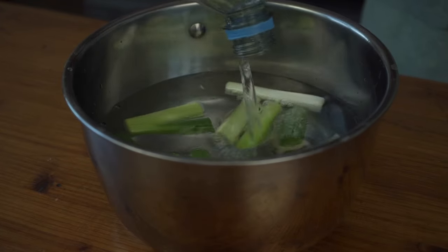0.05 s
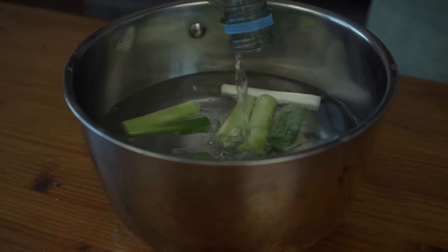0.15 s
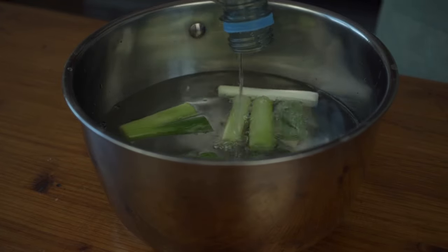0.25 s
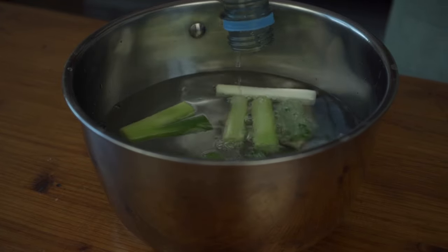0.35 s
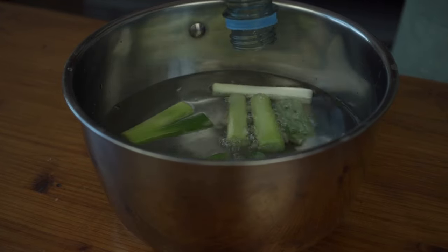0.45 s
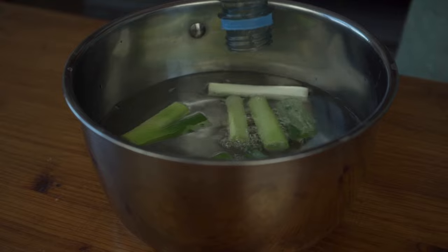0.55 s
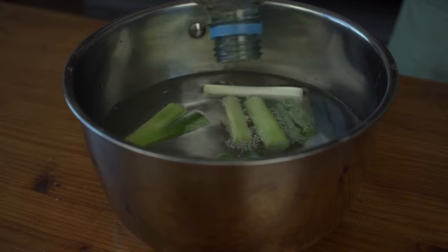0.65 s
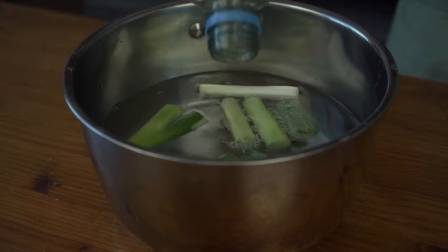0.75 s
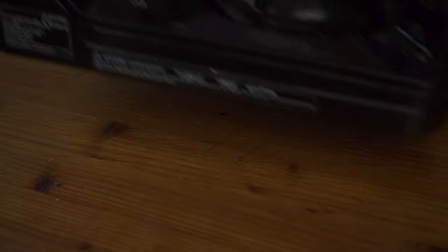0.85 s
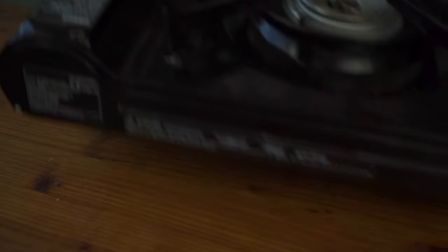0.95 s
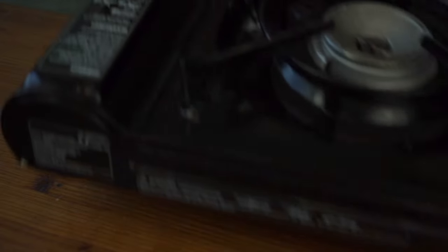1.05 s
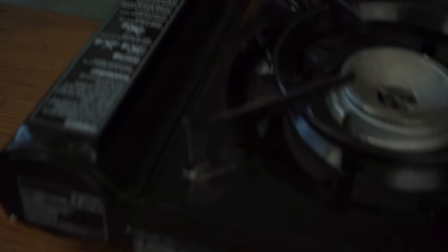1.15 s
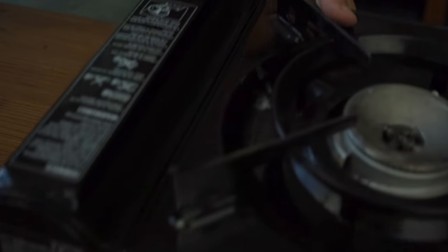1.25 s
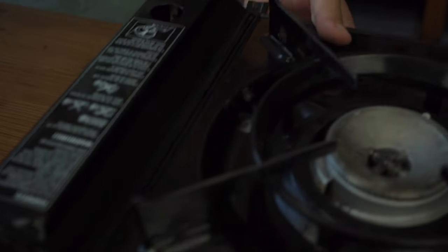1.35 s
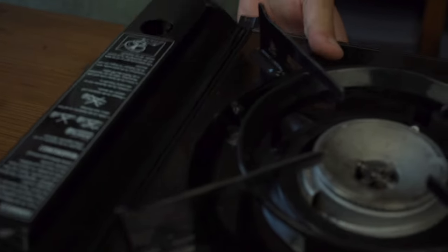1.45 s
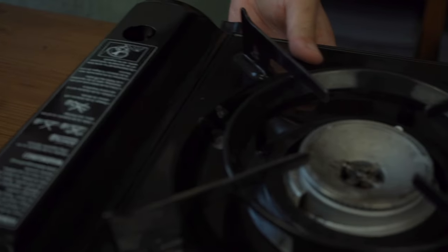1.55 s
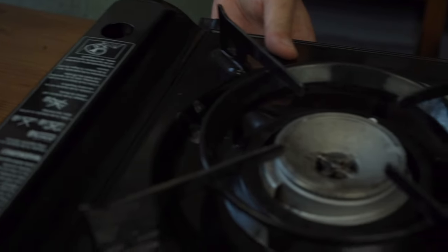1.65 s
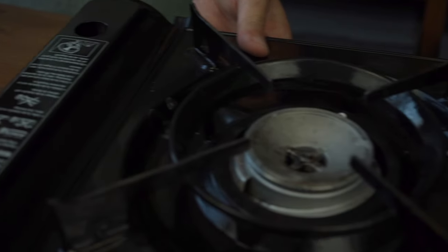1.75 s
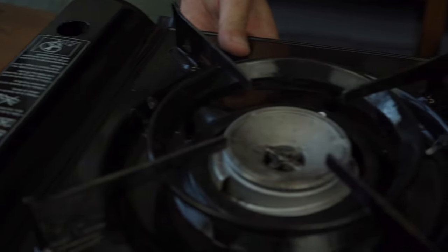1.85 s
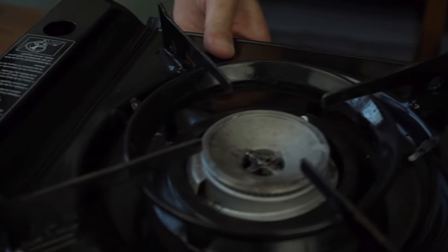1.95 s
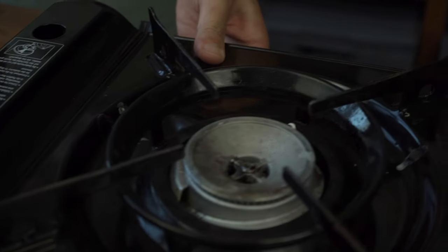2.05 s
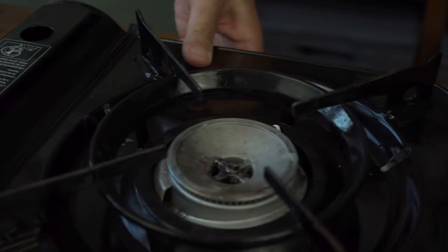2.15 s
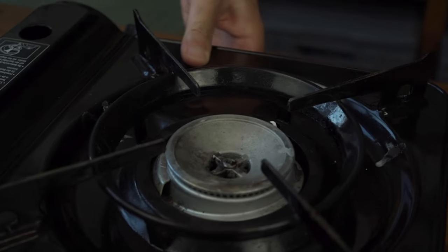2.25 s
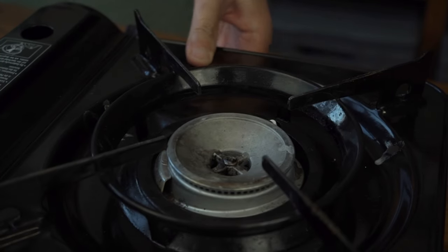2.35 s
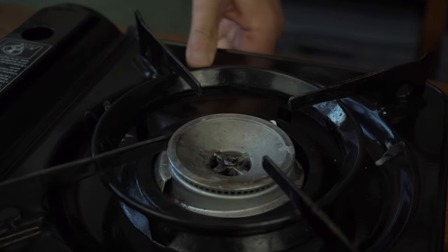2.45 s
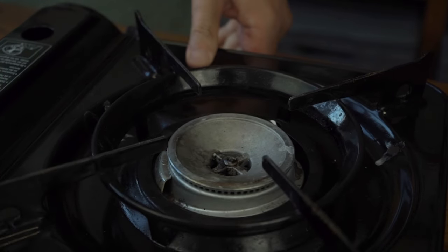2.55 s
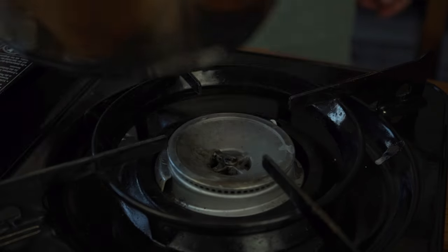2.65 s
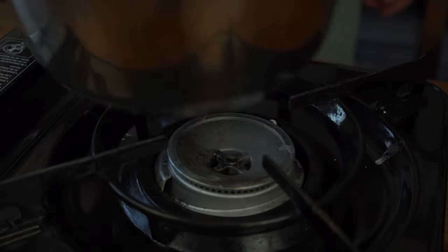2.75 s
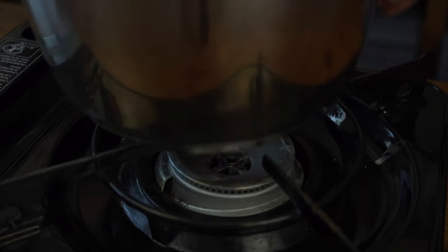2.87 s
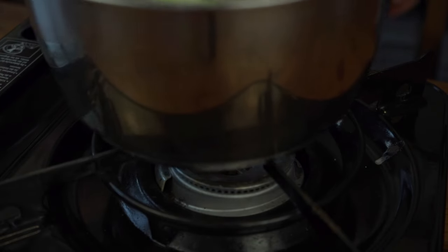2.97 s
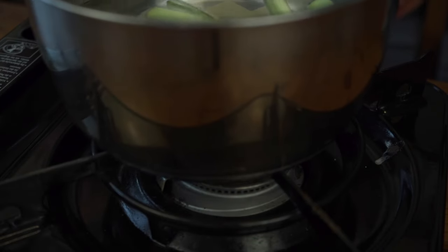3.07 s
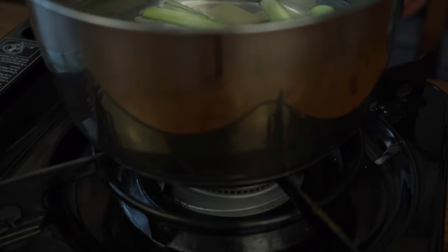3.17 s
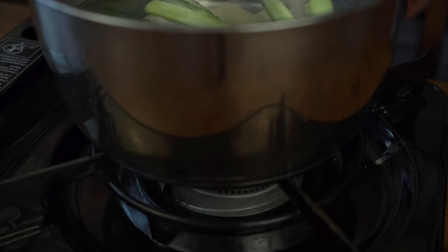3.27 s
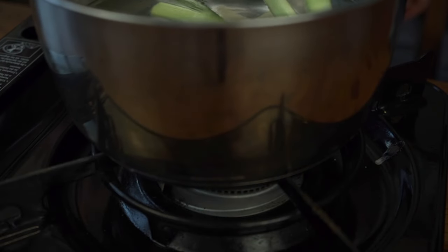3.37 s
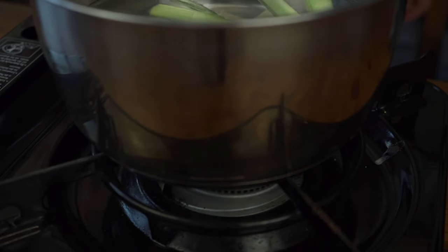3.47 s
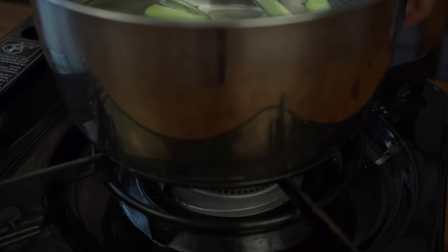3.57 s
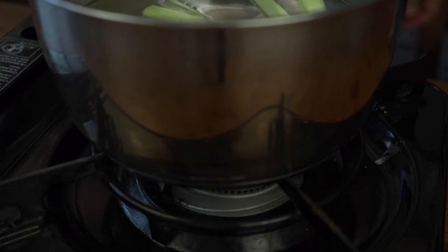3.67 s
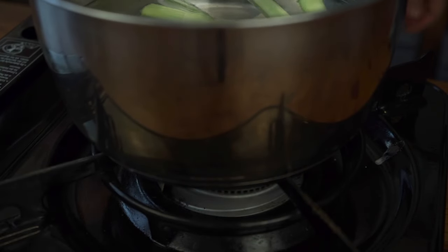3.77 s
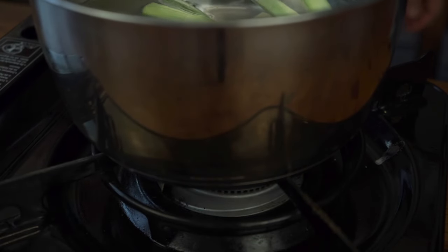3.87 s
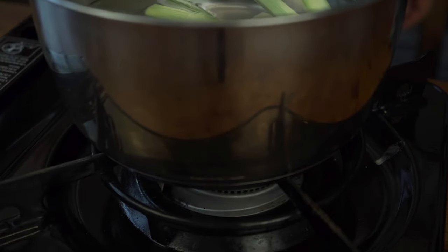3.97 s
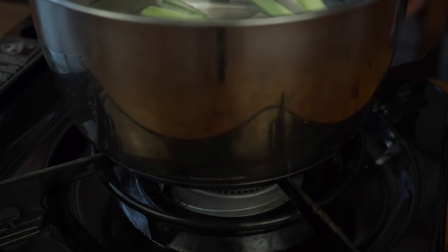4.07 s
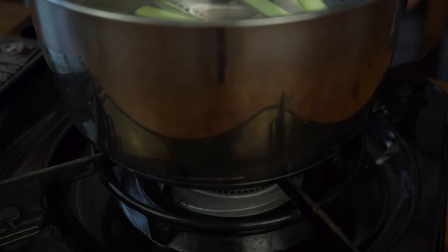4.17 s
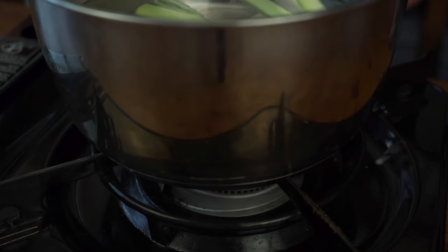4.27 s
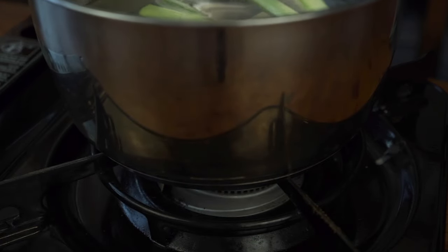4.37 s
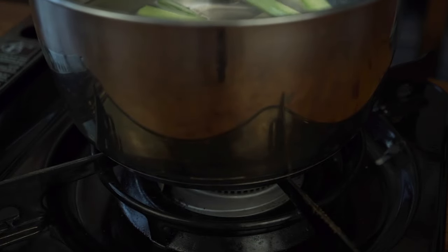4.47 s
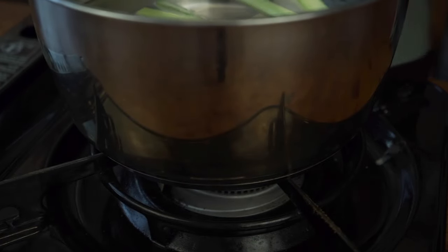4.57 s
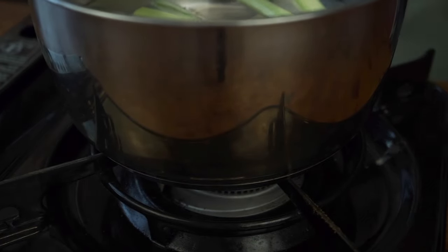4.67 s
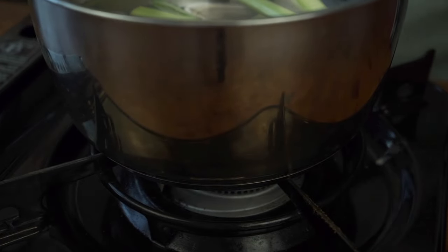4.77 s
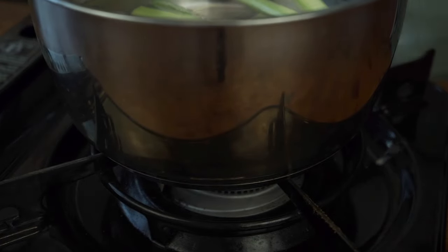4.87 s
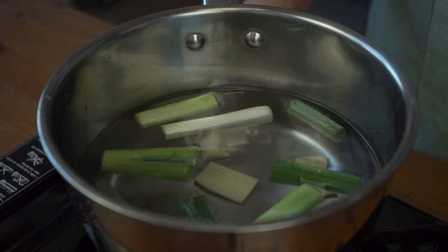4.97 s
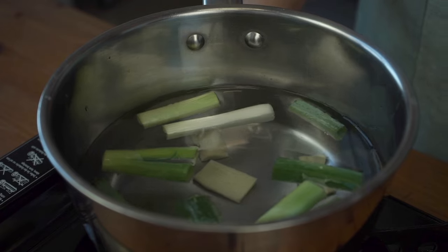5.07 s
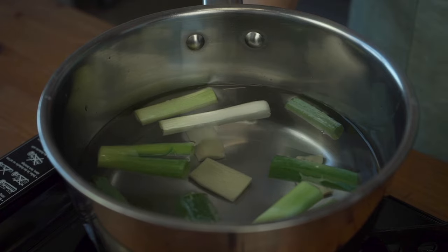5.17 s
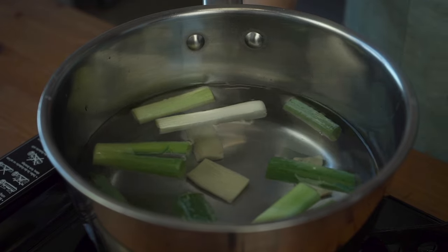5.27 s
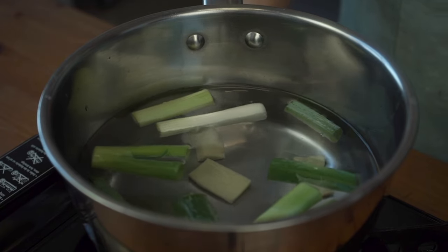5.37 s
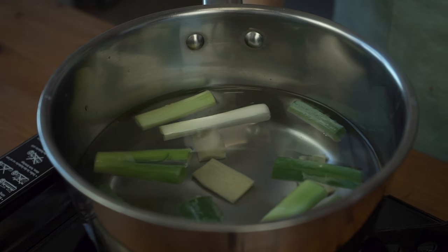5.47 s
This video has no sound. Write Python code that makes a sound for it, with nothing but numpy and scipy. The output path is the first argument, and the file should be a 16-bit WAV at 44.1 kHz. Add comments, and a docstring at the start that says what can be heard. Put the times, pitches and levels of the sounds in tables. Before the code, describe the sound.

Brief water drips, sheet-metal stove clunks and scrapes on wood, heavy pot knocks on a grate, finally a latch click and short hiss.

```python
"""A sheet-metal camping stove is put on a wooden table and shifted: chattering contacts drive its modes.
Before it the last water trickles from a bottle into a steel pot, as bubbles that ring and splashes.
Then the full pot is set on the grate and rocks on it, and the stove's gas lever is pushed home with
a spurt of hissing, whistling noise. The table sways at its lowest mode beneath a small kitchen's tone
and echo; drops, blows and sway break off within milliseconds at three instants."""
import sys
import numpy as np
from scipy import signal
from scipy.fft import rfft, irfft, next_fast_len
from scipy.io import wavfile
from scipy.ndimage import uniform_filter1d, map_coordinates

SR = 44100
rng = np.random.default_rng(int(sys.argv[2]) if len(sys.argv) > 2 else 0)


def linear_from_db(decibels):
    """Turn decibels (scalar or array-like) into linear amplitude factors; 0 gives 1."""
    return 10 ** (np.asarray(decibels, float) / 20)


def generate_wav(signal):
    """Clip the signal to [-1, 1] and save it as 16-bit WAV at the path in sys.argv[1]."""
    frames = np.transpose(np.atleast_2d(signal))
    scaled = np.clip(frames, -1, 1) * 32767
    pcm = np.round(scaled).astype(np.int16)
    wavfile.write(sys.argv[1], SR, pcm)


N = 243520


def unit(x):
    """Normalisation to a root-mean-square of 1."""
    return x / np.sqrt(np.mean(x ** 2) + 1e-20)


def along(points, hz):
    """Interpolation of (Hz, value) points on a logarithmic frequency axis."""
    f, v = np.transpose(points)
    return np.interp(np.log(hz + 1), np.log(f + 1), v)


def curves(rows):
    """Linear interpolation in time: one value per sample for each column after the time."""
    s, *columns = np.transpose(rows)
    return [np.interp(np.arange(N) / SR, s, column) for column in columns]


def during(rows):
    """A rectangular gate: true from the first to the last time of the rows."""
    t = np.arange(N) / SR
    return (t >= rows[0][0]) & (t <= rows[-1][0])


def wobble(rate):
    """Slow random fluctuation: a smooth curve through random knots, rate of them per second."""
    knots = rng.standard_normal(int(N * rate / SR) + 4)
    return map_coordinates(knots, [np.arange(N) * rate / SR])


def filtered(x, response):
    """Linear filtering: the spectrum of x times a complex response of frequency."""
    m = next_fast_len(len(x) + SR // 4)
    return irfft(rfft(x, m) * response(np.fft.rfftfreq(m, 1 / SR)), m)[:len(x)]


def noise(spectrum):
    """Coloured noise: white noise shaped by (Hz, dB) points, at rms 1."""
    return unit(filtered(rng.standard_normal(N), lambda hz: linear_from_db(along(spectrum, hz))))


def causal(gain):
    """Minimum phase: folding the cepstrum lets nothing sound before the blow."""
    cepstrum = irfft(np.log(gain + 1e-6))
    cepstrum[1:len(cepstrum) // 2] *= 2
    cepstrum[len(cepstrum) // 2 + 1:] = 0
    return np.exp(rfft(cepstrum))


def ringing(modes, hz, spread_db):
    """Modal superposition: damped resonances, each excited at a new random strength."""
    total = 0
    for k, (centre, db, t60) in enumerate(modes):
        width = np.log(1000) / np.pi / t60  # Hz; a longer decay is a narrower resonance
        strength = (-1) ** k * linear_from_db(db + spread_db * rng.standard_normal())
        damping = 1j * hz * width
        total = total + strength * damping / (centre * centre - hz * hz + damping)
    return total


def kitchen(x, wet_db):
    """Reverberation: the sound plus a diffuse echo whose decay depends on frequency."""
    # Each row: frequency in Hz, decay time (60 dB) in seconds
    decay = [(100, 0.41), (1000, 0.44), (4000, 0.36), (9000, 0.34), (16000, 0.08)]
    hz, t, z = signal.stft(rng.standard_normal(SR // 2), SR, nperseg=256)
    fading = linear_from_db(-60 * t / along(decay, hz)[:, None])
    tail = signal.istft(z * fading, SR, nperseg=256)[1]
    tail *= np.clip(np.arange(len(tail)) / (SR * 0.0022), 0, 1)  # the echo builds up over 2.2 ms
    return x + linear_from_db(wet_db) * signal.fftconvolve(x, tail / np.linalg.norm(tail))[:len(x)]


def add(out, s, sound):
    """Superposition at time s; a 4 ms fade ends the sound at the next break."""
    # The instants, in seconds, at which sounds break off
    breaks = [.845, 2.627, 4.93]
    start = round(s * SR)
    end = min([round(b * SR) for b in breaks if b > s] + [N + SR])
    left = (end - start - np.arange(len(sound))) / SR
    out[start:][:len(sound)] += (sound * np.clip(left / .004, 0, 1))[:N - start]


def trickle():
    """Bubble acoustics in bulk: many tiny decaying bubbles, smaller ones fainter, merge into a fizz."""
    # Each row: time in seconds, relative level of the fizz in dB
    fizz_level = [(0.0, -53.5), (0.218, -51), (0.348, -54), (0.5, -101)]
    when, pitch, size = rng.random((450, 3)).T
    start = (when * fizz_level[-1][0] * SR).astype(int)
    hz = 1500 * 7.5 ** pitch[:, None]
    u = np.arange(400) / SR
    grains = linear_from_db(16 * size ** 2)[:, None] * np.sin(2 * np.pi * hz * u) * np.exp(-u * hz / 4.5)
    fizz = np.bincount((start[:, None] + np.arange(len(u))).ravel(), grains.ravel(), N)
    gate = during(fizz_level)
    return linear_from_db(curves(fizz_level)[0] - 5.5) * gate * fizz / np.std(fizz[gate])


def room_tone():
    """Stationary coloured noise for the air, and a faint amplitude-modulated hiss that comes and goes."""
    # Each row: frequency in Hz, level in dB per Hz (before scaling to rms 1)
    air = [(24, -36), (40, 7), (85, -17.5), (118, -32), (163, -6.5), (269, -4), (297, -9.5), (479, -10),
           (646, -10.5), (990, -12.5), (1300, -14), (1760, -17.5), (3470, -25.5), (4680, -23),
           (16000, -43.5)]
    # Each row: frequency in Hz, level in dB per Hz (before scaling to rms 1)
    hiss_colour = [(1470, 4), (2500, 2.5), (4410, 0.5), (8660, -1.5), (11200, -11), (13800, -10),
                   (16000, -25)]
    # Each row: start in seconds, length in seconds, relative level in dB
    swell_rows = [(0.454, 0.53, -61), (1.676, 0.49, -65), (2.0, .03, -82), (2.011, 0.41, -64),
                  (3.497, 0.2, -66), (3.924, 0.13, -62), (4.059, 0.33, -59), (4.442, .03, -74),
                  (4.59, 0.1, -60), (4.786, 0.18, -61)]
    edge = 0.23  # share of a swell spent rising, and again fading
    t = np.arange(N) / SR
    swells = 0
    for s, length, db in swell_rows:
        rise_and_fade = np.minimum(t - s, s + length - t) / (edge * length)
        swells = swells + linear_from_db(db - 1.5) * np.clip(rise_and_fade, 0, 1)
    return linear_from_db(-59) * noise(air) + swells * linear_from_db(0.53 * wobble(15)) * noise(hiss_colour)


def table():
    """Damped vibration: jolts sway the table at its lowest mode, felt through the microphone stand.

    A rumble of the legs and a low hum follow the power of the sway."""
    # Each row: start in seconds, level in dB (before the slow rise), frequency in Hz, decay time in seconds
    jolts = [(0.039, -39.5, 37.8, 0.57), (0.219, -56, 37.5, 0.47), (.6, -66, 40, 0.43), (.84, -53, 40, .5),
             (1.038, -46, 36.6, 1.7), (1.255, -23.5, 38.5, 0.42), (1.345, -24.5, 37.4, 0.45),
             (1.444, -13, 33.2, 0.83), (2.02, -31, 35.45, 0.83), (2.299, -35, 36.1, 1.3),
             (2.48, -23, 34, 0.62), (3.147, -30, 37.8, 0.97), (3.409, -31.5, 38.1, 0.75),
             (3.589, -39.5, 33.86, 0.73), (3.73, -40.5, 34.1, .9), (3.94, -40, 36, .8),
             (4.191, -35, 36, 0.71), (4.45, -44, 37.7, 1.1), (4.711, -38.5, 36.8, 0.9),
             (4.931, -46, 38, 0.48), (5.12, -41, 34.5, .6), (5.214, -29.5, 34, 0.55),
             (5.338, -25, 31.6, 2.3)]
    # Each row: frequency in Hz, level in dB per Hz (before scaling to rms 1)
    hum_colour = [(50, -27.5), (90, -1), (140, 0.5), (200, -3), (450, -16.5), (900, -53)]
    rise_s, rest_db = 0.034, -62.5
    sway, power, t = np.zeros(N), np.full(N, linear_from_db(2 * rest_db)), np.arange(SR) / SR
    for s, db, hz, t60 in jolts:
        size = linear_from_db(db - 60 * t / t60) * (1 - np.exp(-t / rise_s)) ** 2
        add(sway, s, np.sqrt(2) * size * np.sin(2 * np.pi * (hz * t + rng.random())))
        add(power, s, size ** 2)
    sway_db = 10 * np.log10(power)
    legs = noise([(10, -19.0), (20, 13.0), (50, 5.5), (75, -5), (120, -54.0)])  # (Hz, dB)
    rumble = unit(linear_from_db(1.9 * wobble(31)) * legs)
    # the hum lies at -53.5 dB for a sway of -37 dB and grows 0.52 dB per dB of sway
    hum_db = -53.5 + 0.52 * (sway_db + 37) + 1.4 * wobble(45)
    return sway + linear_from_db(sway_db - 5) * rumble + linear_from_db(hum_db) * noise(hum_colour)


def drops():
    """Bubble resonance: each drop closes a bubble of rising pitch, and its splash rings the filled pot. The
    last row, at 0.749 s, is a lone small knock made the same way."""
    # Each row: time in seconds, relative level in dB, bubble pitch at its start in Hz,
    # relative splash level against the bubble in dB
    drop_rows = [(0.04, -25, 1820, 6.5), (0.063, -39, 2050, 3), (0.093, -40, 3450, 8),
                 (0.099, -26.5, 1315, -1.5), (0.141, -28, 1048, -4), (0.154, -32, 880, -4),
                 (0.195, -32.5, 2700, -2), (0.242, -43, 1350, -15), (0.249, -35.5, 3300, -30),
                 (0.263, -32.5, 2920, -9), (0.278, -35, 947, -24), (0.28, -23.5, 2606, -23),
                 (0.289, -26.5, 3050, -34), (0.321, -48, 2630, -14), (0.255, -43, 2800, -15),
                 (0.27, -41, 2780, -20), (0.336, -47, 2580, -7), (0.345, -32.5, 2490, -11),
                 (0.376, -40.5, 3950, -4.5), (0.303, -43, 2950, -20), (0.105, -35, 1140, -4),
                 (0.749, -44, 870, -8)]
    # (Hz, dB per Hz)
    spray_colour = [(600, -24), (1500, -14), (5000, -9), (6600, -6), (7300, 0), (8500, 0), (9500, -6),
                    (12000, -9), (16000, -16)]
    # (Hz, dB, decay time s)
    filled_pot = [(1000, 0, .06), (1400, -5, .04), (1950, -2, .07), (2620, -2, .06), (3600, -5, .03),
                  (5700, -8, .02)]
    t60 = 0.021  # s, of bubble and splash
    out, t = np.zeros(N), np.arange(SR // 4) / SR
    for s, db, hz, splash_db in drop_rows:
        smooth = uniform_filter1d(uniform_filter1d(rng.standard_normal(len(t)), size=30), size=30)
        envelope = linear_from_db(-60 * t / t60 + 3 * unit(smooth)) * (1 - np.exp(-t / 0.00019))
        bubble = envelope * np.sin(2 * np.pi * hz * t * (1 + 0.042 * t / t60))
        spray = unit(filtered(rng.standard_normal(len(t)), lambda f: linear_from_db(along(spray_colour, f))))
        drop = linear_from_db(db - 2.5) * (bubble + linear_from_db(splash_db - 6.0 - 60 * t / t60) * spray)
        drop = drop + linear_from_db(4) * filtered(drop, lambda f: ringing(filled_pot, f, spread_db=3))
        add(out, s - .0005, kitchen(drop, wet_db=-14.0))
    return out


def blows(rows, modes, colour, linger, click_share, ring_db, push_db, thud_hz, wet_db, trim_db):
    """Impact excitation: bursts of chattering contact drive a body's broad response and its modes."""
    out, t = np.zeros(N), np.arange(16384) / SR
    hz = np.fft.rfftfreq(len(t), 1 / SR)
    low = 1 / (1 + 1j * hz / 900)  # low-pass at 900 Hz
    for s, db, thud_db, edge_db, t60 in rows:
        # the first touch stands out of the chatter, more so in hard blows
        crack = linear_from_db(3 + 0.3 * (db + 1) - 60 * t / 0.007)
        chatter = rng.standard_normal(len(t)) * (1 - np.exp(-t / (0.006 * t60))) * (1 + crack)
        brief = chatter * linear_from_db(-60 * t / t60)
        # heavy parts keep shaking after the treble has died
        lingering = chatter * linear_from_db(-60 * t / (linger * t60))
        contact = rfft(brief) * (1 - low) + rfft(lingering) * low
        contact = contact + linear_from_db(push_db) * np.linalg.norm(brief) * low  # one blunt push begins it
        # a flat landing adds thud, a hard edge adds click and, more so, treble
        click_db = click_share * edge_db
        tilt = along([(thud_hz, thud_db), (2.0 * thud_hz, 0), (1400, 0), (2400, click_db),
                      (4200, click_db), (5000, edge_db)], hz)
        body = causal(linear_from_db(along(colour, hz) + tilt))
        z = contact * body * (3 + linear_from_db(ring_db) * ringing(modes, hz, spread_db=3))
        # the level is set by the middle band in the first 8 ms
        first = irfft(z * (hz > 500) * (hz < 4500))[:round(SR * .008)]
        blow = linear_from_db(db + trim_db) * irfft(z) / np.sqrt(np.mean(first ** 2))
        add(out, s, kitchen(blow, wet_db))
    return out


def stove():
    """Impact of thin sheet metal on wood: the stove's panels ring in their modes."""
    # Each row: start in seconds, relative level in dB, extra thud in dB, extra edge in dB,
    # chatter decay time in seconds
    stove_blows = [(1.252, -7, -4.5, 10, 0.053), (1.285, -33, -2.5, 10, 0.111),
                   (1.298, -18.5, -5.5, 7, 0.081), (1.332, -19, -4, 7, 0.17),
                   (1.366, -22.5, -17, 5.5, 0.075), (1.384, -25, 8, 3.5, .039),
                   (1.427, -27, -13, -25, 0.12), (1.437, -5, 8.5, -2.8, 0.16), (1.454, -8, -0.5, 0.5, 0.05),
                   (1.467, -14, 2, -2.5, 0.23), (1.594, -27, -20, -6.5, 0.16), (1.778, -35, 5.5, -27, 0.15),
                   (2.007, -30.5, 3.5, -3.5, .067), (2.039, -40.5, 13, -9, 0.13),
                   (2.204, -37.5, -14, -30, 0.072), (2.28, -32.5, 6.5, -21, 0.1),
                   (2.479, -19, 8, 9.5, 0.067), (2.488, -22, 10, 1, 0.049), (2.496, -14, 8.5, -9, 0.079)]
    # Each row: frequency in Hz, relative strength in dB, decay time in seconds
    stove_modes = [(125, 6, .16), (339, 4, .1), (440, 7, .04), (578, 4, .07), (807, 2, .07), (930, 5, .07),
                   (1130, 5, .07), (1367, 3, .07), (1852, 2, .06), (2191, 3, .06), (2676, 3, .05),
                   (3365, 1, .04), (4210, 1, .05), (6600, 3, .04)]
    # Each row: frequency in Hz, relative gain of the broad body in dB
    stove_colour = [(35, -36.5), (70, 3), (150, -6.5), (250, -5.5), (400, -11), (700, -5.5), (1100, -2),
                    (1600, -6), (2600, -9.5), (5000, -17.5), (8500, -21), (12000, -34), (16000, -39)]
    return blows(stove_blows, stove_modes, stove_colour, linger=1.11, click_share=0.36, ring_db=1.5,
                 push_db=-3.5, thud_hz=490, wet_db=-12.0, trim_db=-9.5)


def slide():
    """Friction excitation: the feet, dragged on wood, rub unevenly and keep the panels murmuring."""
    # Each row: time in seconds, relative level in dB
    drag = [(1.62, -48), (1.78, -46), (1.89, -51.5), (2.02, -48.5), (2.2, -50.5), (2.27, -53), (2.36, -80)]
    # (Hz, dB, decay time s)
    panels = [(300, -3, .01), (600, 0, .015), (850, -2, .015), (1130, 3, .022), (1350, -2, .018),
              (1850, -9, .008), (2600, -19, .004)]
    rub = rng.standard_normal(N) * linear_from_db(3.5 * wobble(25))
    murmur = unit(filtered(rub, lambda hz: ringing(panels, hz, spread_db=1)))
    return linear_from_db(curves(drag)[0] - 2.5) * during(drag) * murmur


def rocking():
    """Repeated impact: each rock of the pot taps the grate three times, harder taps being brighter."""
    # Each row: first tap in seconds, its relative level in dB, wait for the rebound in seconds,
    # relative level of the rebound in dB, relative level of the last tap in dB
    rocks = [(3.718, -25, 0.038, -25, -40), (3.933, -18, 0.045, -24, -25.5),
             (4.184, -19.5, 0.051, -28, -34), (4.444, -19, .057, -24, -34.5),
             (4.701, -20, 0.06, -30.5, -44)]
    taps = []
    for s, first_db, wait, rebound_db, last_db in rocks:
        # the last tap comes 1.85 waits after the first
        for later, db in [(0, first_db), (wait, rebound_db), (1.85 * wait, last_db)]:
            edge_db = -6 + 2.07 * (db + 23.5)
            taps.append((s + later, db, 0.5, edge_db, 0.067))  # thud 0.5 dB, chatter 0.067 s
    return taps


def pot():
    """Impact of a loaded shell: the full pot lands and rocks on the grate, its low parts lingering."""
    # Each row: start in seconds, relative level in dB, extra thud in dB, extra edge in dB,
    # chatter decay time in seconds
    pot_blows = [(3.147, -6.5, -1.5, 2, 0.06), (3.161, -27.5, 6, 7.5, 0.033),
                 (3.223, -20.5, 4.5, -18, 0.037), (3.239, -22, 9.5, -13.5, 0.052),
                 (3.364, -1.5, -10.5, 21, 0.043), (3.401, -13.5, 6.5, 12, 0.031),
                 (3.41, -6.5, -15, 17, 0.03), (3.418, -10.5, 1, 8.5, 0.035)]
    # Each row: frequency in Hz, relative strength in dB, decay time in seconds
    pot_modes = [(126, 9, .15), (210, 6, .1), (528, 5, .07), (690, 4, .06), (900, 5, .06), (1240, 7, .06),
                 (1655, 7, .055), (2150, 6, .05), (2600, 2, .04), (3010, 5, .04), (3370, 5, .035),
                 (3850, 6, .04)]
    # Each row: frequency in Hz, relative gain of the broad body in dB
    pot_colour = [(35, -31), (80, 1), (140, 3.5), (300, -7), (550, 4), (1100, 2.5), (2200, -0.5),
                  (3400, -3), (4150, -12.5), (4500, -21), (6500, -29.5), (8500, -30), (10500, -44),
                  (16000, -49)]
    return blows(pot_blows + rocking(), pot_modes, pot_colour, linger=2.18, click_share=0.45, ring_db=1.0,
                 push_db=-4.5, thud_hz=280, wet_db=-15.0, trim_db=-10.5)


def lever():
    """Impact of a small mechanism: the pushed gas lever knocks and rings in its modes."""
    # Each row: start in seconds, relative level in dB, extra thud in dB, extra edge in dB,
    # chatter decay time in seconds
    lever_blows = [(5.094, -16, -2, 4, 0.063), (5.117, -15.5, 3, 12.5, 0.069),
                   (5.208, -15.5, -1, -1.5, 0.12), (5.219, -15.5, 2.5, -9, 0.071),
                   (5.231, -23, 12.5, 1, 0.09), (5.307, -31, -14, -9, .027), (5.324, -9.5, -3, -4.5, 0.088),
                   (5.33, -16.5, 2, 19, 0.1), (5.337, -14, 8, 7, 0.09)]
    # Each row: frequency in Hz, relative strength in dB, decay time in seconds
    lever_modes = [(200, 1, .1), (412, 5, .25), (588, 7, .08), (684, 7, .05), (952, 3, .08), (1250, 8, .08),
                   (2190, 3, .07), (2640, 1, .06), (3740, 4, .06), (4220, 4, .06)]
    # Each row: frequency in Hz, relative gain of the broad body in dB
    lever_colour = [(35, -38), (60, -19), (198, -8), (301, -14), (579, -3), (621, -3.5), (1410, -6),
                    (2410, -11.5), (12700, -29.5), (16000, -35)]
    return blows(lever_blows, lever_modes, lever_colour, linger=1.13, click_share=0.67, ring_db=-2.0,
                 push_db=-10, thud_hz=303, wet_db=-12.5, trim_db=-9)


def gas():
    """Jet noise and resonance: as the canister seats, a spurt of gas hisses and whistles in the valve."""
    # Each row: time in seconds, relative hiss level in dB, relative whistle level in dB
    spurt = [(5.337, -19, -43), (5.341, -13, -29.5), (5.352, -24, -32), (5.373, -23.5, -29),
             (5.423, -30, -50), (5.52, -45.5, -74)]
    # Each row: frequency in Hz, level in dB per Hz (before scaling to rms 1)
    hiss_colour = [(120, -32), (200, -5.5), (360, -10.5), (409, 4), (509, -20.5), (933, -5), (2650, -12.5),
                   (3370, -4), (6640, -19), (9230, -19), (16000, -52)]
    # Each row: frequency in Hz, relative strength in dB, decay time in seconds
    valve = [(3480, -10, .15), (9076, 0, .09), (13120, -7.5, .15), (15350, -16, .07)]
    hiss_db, whistle_db = curves(spurt)
    hiss = linear_from_db(hiss_db + 1.5 + 0.46 * wobble(60)) * noise(hiss_colour)
    whistle = unit(filtered(rng.standard_normal(N), lambda hz: ringing(valve, hz, spread_db=1)))
    return during(spurt) * (hiss + linear_from_db(whistle_db + 3.7) * whistle)


def scene():
    """Linear superposition of all sources in one channel."""
    water = trickle() + drops()
    metal = stove() + slide() + pot() + lever()
    return (water + metal + gas() + table() + room_tone())[None]


def roll_off(x):
    """The treble ends steeply here."""
    return signal.sosfilt(signal.butter(12, 16850, fs=SR, output="sos"), x)


def record(dry):
    """Saturation and band-limiting: the loudest peaks are clipped and the top treble is lost."""
    clipped = dry / (1 + np.abs(dry / .53) ** 8) ** (1 / 8)
    treble_loss = [(15600, -1.5), (16000, -19.5), (16800, -33.5)]  # (Hz, dB)
    dulled = filtered(clipped[0], lambda hz: linear_from_db(along(treble_loss, hz)))
    return roll_off(dulled[None])


dry = scene()
out = record(dry)
generate_wav(out)
```